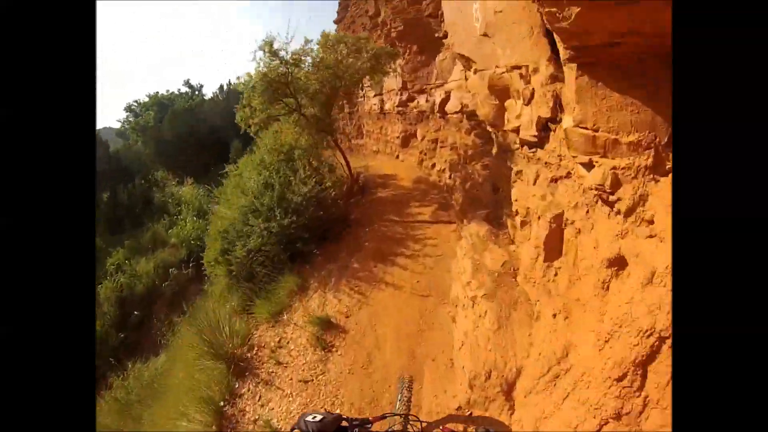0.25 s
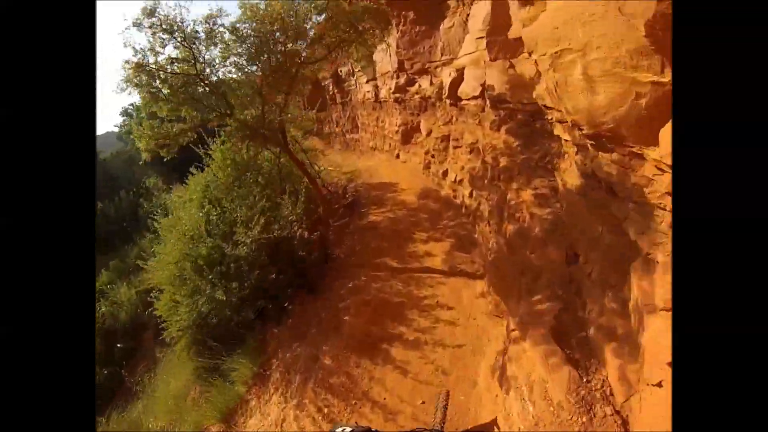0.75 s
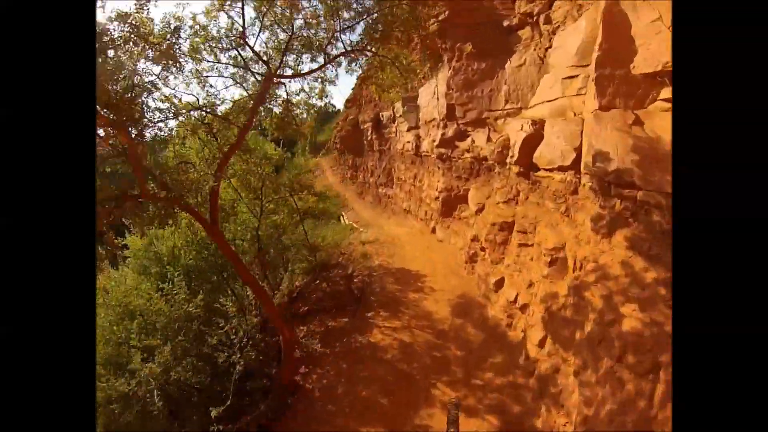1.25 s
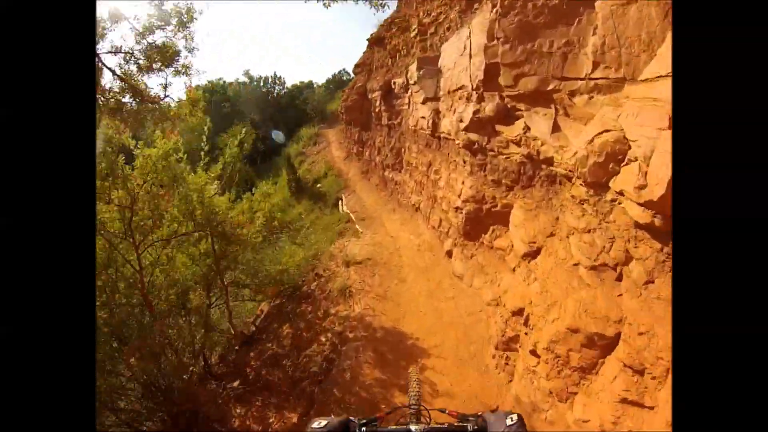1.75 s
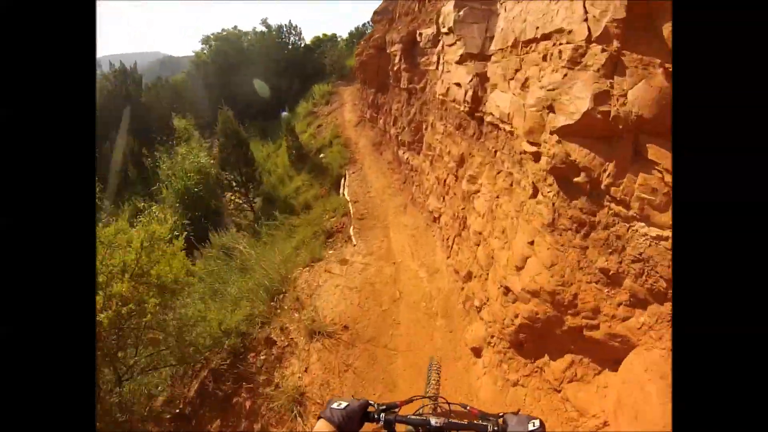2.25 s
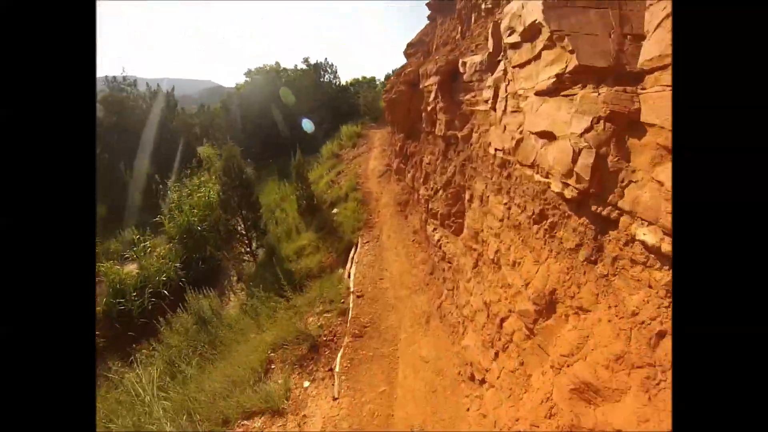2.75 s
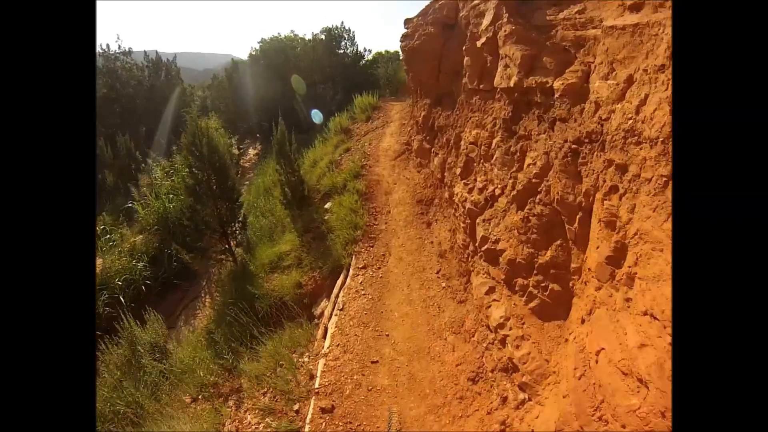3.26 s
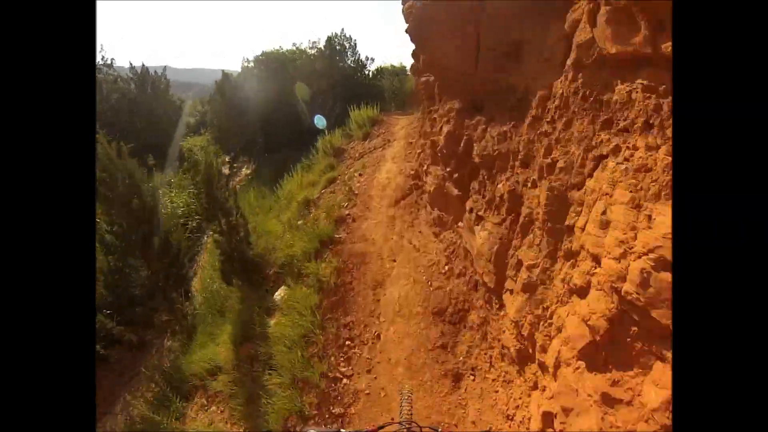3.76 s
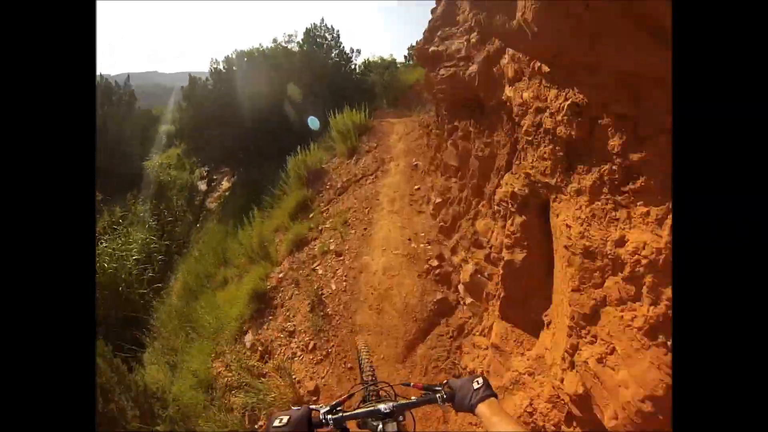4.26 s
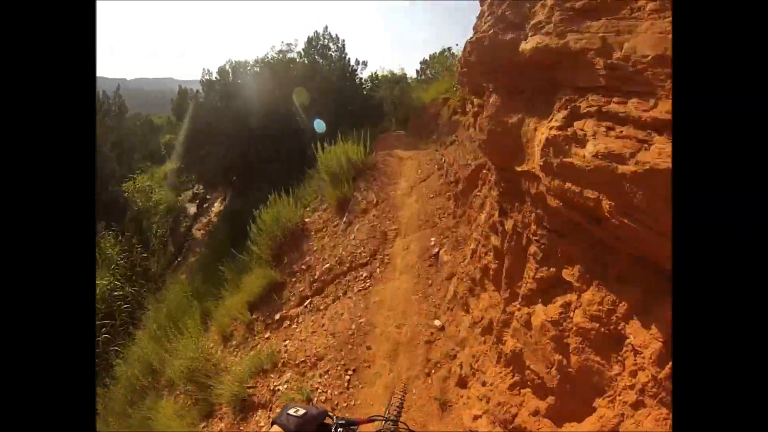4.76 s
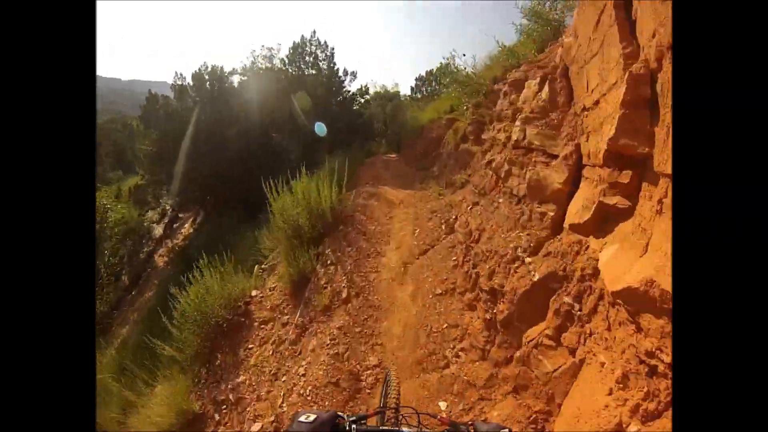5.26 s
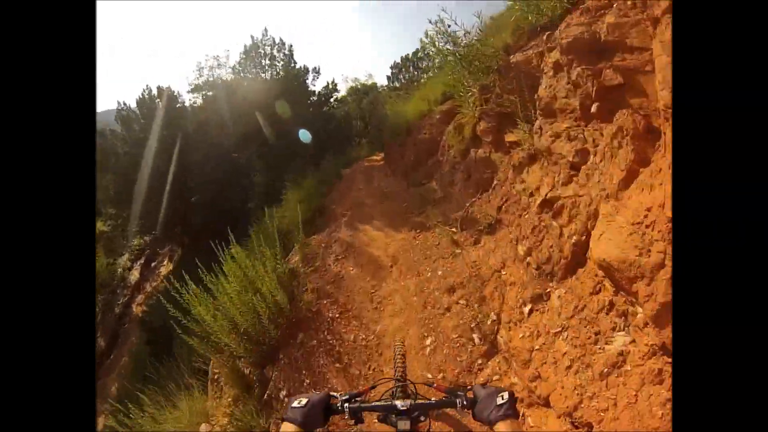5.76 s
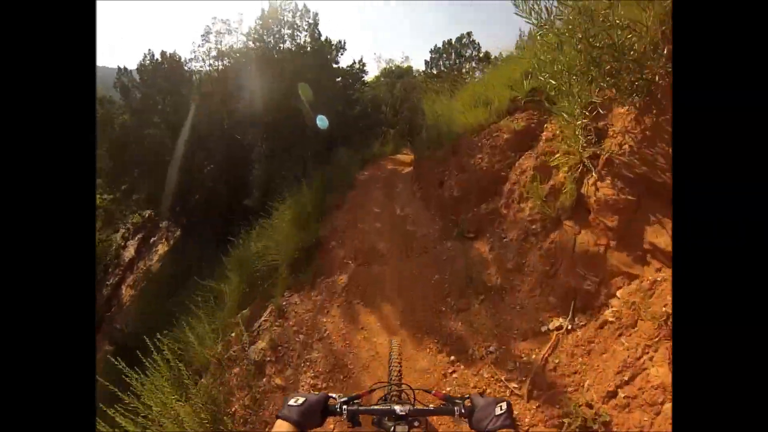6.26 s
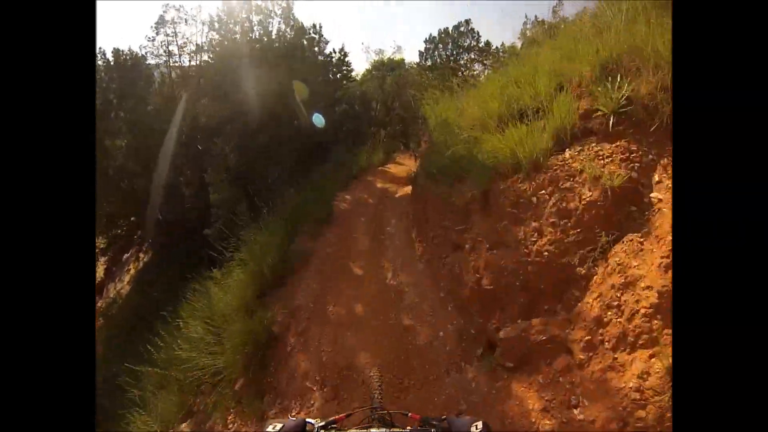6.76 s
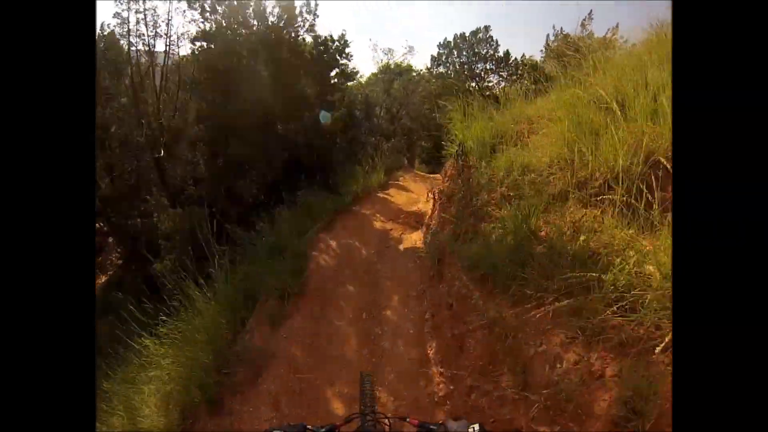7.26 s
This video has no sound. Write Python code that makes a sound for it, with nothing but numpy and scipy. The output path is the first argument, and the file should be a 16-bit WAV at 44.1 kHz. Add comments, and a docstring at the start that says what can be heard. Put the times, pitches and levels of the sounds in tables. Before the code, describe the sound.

A bike-mounted microphone in a muffling housing catches the steady rush of knobbly tyres on a dry trail, with gritty crackle and ticking pebbles. Sharp stone knocks come early, then lighter ground. Dull hollow frame bumps with brief loose rattles follow in the middle and later part. Uneven low wind thumps run underneath, with very faint high brake chirps and slight hiss. Open air, no room echo.

```python
"""A mountain bike's tyres rush and crunch down a dirt trail: shaped noise, grains and short decaying tones.
Stones strike the bike as damped sines with noise bursts, pebbles crack, short tones ring and rubber squeaks.
Bumps ring the frame's modes and rattle loose parts; the disc brakes chirp as gliding harmonic tones.
Wind buffets the microphone as low noise, with a band of flutter and tyre rumble above it and a faint hiss.
All but brakes, wind and rumble is coloured by the resonances of the plastic housing round the microphone."""
import sys
import numpy as np
from scipy import signal
from scipy.fft import rfft, irfft, next_fast_len
from scipy.io import wavfile
from scipy.ndimage import uniform_filter1d, map_coordinates

SR = 44100
rng = np.random.default_rng(int(sys.argv[2]) if len(sys.argv) > 2 else 0)


def master(y):
    """Save y as 16-bit WAV."""
    cut = np.clip(np.atleast_2d(y).T, -1, 1)
    pcm = np.round(cut * 32767)  # scale
    wavfile.write(sys.argv[1], SR, pcm.astype(np.int16))


N = 330750

# the tyres, louder with speed and on looser ground: time_s, base_roll_db, base_grit_db
TYRE_LEVELS = [(0.0, -40, -57), (0.29, -47, -59.5), (0.81, -47.5, -63.5), (1.1, -45, -58.5),
               (1.9, -47.5, -65.5), (2.2, -52.5, -65.5), (2.4, -48.5, -64.5), (3.07, -43, -69.5),
               (3.38, -38.5, -60.5), (3.7, -38.5, -62), (3.92, -38, -58), (4.25, -43, -64.5),
               (5.0, -46, -60), (5.75, -44.5, -60.5), (5.95, -50.5, -63), (6.3, -48, -66),
               (6.83, -54.5, -64), (7.16, -47.5, -67.5), (7.5, -45.5, -60.5)]
# spectrum of crushed grit, also of rattling parts: frequency_hz, relative_density_db
GRIT_SPECTRUM = [(400, 0), (1000, -0.5), (1700, 7), (2600, -0.5), (4000, -4), (5500, -12), (7500, -24),
                 (12000, -32), (16000, -39)]
# spectrum of sand spray and of chain and cable ticks: frequency_hz, relative_density_db
SPRAY_SPECTRUM = [(1500, -43), (4000, 6.5), (6000, 0), (9000, -2.5), (12000, -6.5), (15500, -31)]
# spectrum of what a stone blow stirs up in the bike: frequency_hz, relative_density_db
THUD_SPECTRUM = [(150, -25.5), (420, -5.5), (600, -6.5), (1050, -9.5), (1800, -11.5), (3000, -28),
                 (8000, -53)]
# low wind, and the band of flutter and tyre rumble above it: time_s, base_buffet_db, band_offset_db
WIND_LEVELS = [(0, -33, -9.5), (.2, -37, -10.5), (.42, -30.5, -8.5), (1.3, -32.5, -9.5), (1.85, -34.5, -10),
               (2.2, -36.5, -15.5), (2.55, -31, -11), (2.95, -29.5, -6), (3.4, -29, -8.5), (3.7, -29, -4),
               (4.05, -30.5, -8), (4.48, -27.5, -8), (4.68, -28, -13), (5.08, -39, -4.5), (5.3, -33.5, -9),
               (5.7, -34, -11), (6.2, -29.5, -8), (6.6, -37, -13.5), (6.85, -38, -8), (7.2, -38.5, -6),
               (7.5, -41, -8.5)]
# random unrest of both bands: dB per unit of a random curve, knots per second
UNREST_DB, UNREST_PER_S = 1.83, 12


def amp(db):
    """Level law: decibels to an amplitude gain."""
    return 10 ** (np.asarray(db) / 20)


def unit(x):
    """Power normalisation: scale to rms 1."""
    return x / np.sqrt(np.mean(x ** 2) + 1e-20)


def curves(rows):
    """Linear interpolation: one value per sample for each column after the time."""
    s, *cols = np.transpose(rows)
    return [np.interp(np.arange(N) / SR, s, c) for c in cols]


def wobble(rate):
    """Slow random modulation: a smooth curve through random knots, rate of them a second."""
    knots = rng.standard_normal(int(N * rate / SR) + 4)
    return map_coordinates(knots, [np.arange(N) * rate / SR])


def causal(x, level_of):
    """Minimum-phase filtering: the folded cepstrum turns a level in dB over frequency into a causal filter."""
    m = 2 * next_fast_len(len(x) // 2 + 4096)
    cepstrum = irfft(np.log(amp(level_of(np.fft.rfftfreq(m, 1 / SR)))))
    cepstrum[1:m // 2] *= 2
    cepstrum[m // 2 + 1:] = 0
    response = np.exp(rfft(cepstrum))
    return irfft(rfft(x, m) * response)[:len(x)]


def colour(x, spectrum):
    """Spectral shaping: filter x by (Hz, dB) points joined along log frequency, at rms 1."""
    f, db = np.transpose(spectrum)
    return unit(causal(x, lambda hz: np.interp(np.log(hz + 1), np.log(f), db)))


def fade(t, t60):
    """Exponential damping: a decay of 60 dB in t60 seconds."""
    return np.exp(-np.log(1000) * t / t60)


def add(track, s, sound):
    """Superposition: mix a sound into the track at time s."""
    part = track[max(round(s * SR), 0):][:len(sound)]
    part += sound[:len(part)]


def swells(rows):
    """Level modulation: a half-cosine rise or dip in dB for each (middle s, length s, change dB)."""
    t = np.arange(N) / SR
    return sum(change_db * np.cos(np.pi * np.clip((t - s) / length, -.5, .5))
               for s, length, change_db in rows)


def grains(rate, spread_db):
    """Shot noise: sparse impulses of uneven size and random sign, on average rate a second."""
    size = amp(spread_db * np.minimum(rng.exponential(size=N), 4))
    return unit((rng.random(N) < rate / SR) * size * rng.choice([-1, 1], N))


def scatter(t, spectrum, rise, t60, tail_db, tail_t60):
    """Granular contact: shaped noise swells, dies fast and leaves a ragged trickle."""
    drift = uniform_filter1d(rng.standard_normal(len(t)), size=130)
    ragged = unit(amp(5 * unit(drift)))
    decay = fade(t, t60) + amp(tail_db) * ragged * fade(t, tail_t60)
    shape = (1 - np.exp(-t / rise)) ** 2 * decay
    return colour(rng.standard_normal(len(t)) * shape, spectrum)


def tyres():
    """Rolling noise: knobs patter on packed dirt and crush grit and pebbles, which come in clumps."""
    # spectrum of knobs on packed dirt: frequency_hz, relative_density_db
    roll_spectrum = [(120, -7), (250, 4), (370, 5), (560, -3), (750, -4), (1100, -10.5), (1350, -16),
                     (1700, -15.5), (2200, -23), (4000, -35), (9000, -90)]
    # patches of loose gravel that the tyres plough through: middle_s, length_s, change_db
    gravel = [(.03, .08, 1), (.92, .07, 3), (2.41, .08, 6), (1.07, 0.047, 3), (1.24, 0.12, 5.5),
              (1.41, 0.092, 9), (3.28, .07, 8), (3.325, 0.045, 5), (3.42, 0.091, 7), (3.51, .08, 2),
              (3.61, .08, 2), (3.68, .05, -1), (3.85, .07, 3), (4.06, .05, 4), (5.32, .08, 4),
              (7.06, .06, 4), (7.37, 0.11, 2.5)]
    roll_db, grit_db = curves(TYRE_LEVELS)
    grit_db = grit_db + swells(gravel) - .7
    clumps = wobble(35)
    patter = rng.standard_normal(N) + amp(-9.0) * grains(rate=360, spread_db=1.0)
    crush = rng.standard_normal(N) + amp(-7.0) * grains(rate=420, spread_db=2.0)
    roll = amp(roll_db - 0.96 + 2.56 * clumps) * colour(patter, roll_spectrum)
    grit = amp(grit_db + 3.5 + 1.34 * clumps) * colour(crush, GRIT_SPECTRUM)
    tick_db = (roll_db + grit_db) / 2 - 1 + clumps
    return roll + grit + amp(tick_db) * pebbles(rate=240, spread_db=4.3)


def pebbles(rate, spread_db):
    """Damped oscillation: small stones tick under the tread, each at its own pitch for a cycle or two."""
    rows = rng.random((int(rate * N / SR), 3))
    t = np.arange(SR // 100) / SR
    hz = 800 * 5 ** rows[:, 1:2]
    # the higher the pitch, the weaker the tick
    size = amp(-spread_db * np.log(rows[:, 2:] + .04)) * 800 / hz
    ticks = size * np.sin(2 * np.pi * hz * t) * fade(t, 2.8 / hz) * (1 - np.exp(-t * hz))
    where = (rows[:, :1] * N).astype(int) + np.arange(len(t))
    return unit(np.bincount(where.ravel(), ticks.ravel(), N)[:N])


def crackle():
    """Brittle fracture and light impact: pebbles snap under the tread; slack chain and cables click higher up."""
    # pebbles that crack under the tread: start_s, nominal_peak_db
    cracks = [(0.2637, -38), (0.413, -48.5), (0.504, -43.5), (0.605, -46), (0.802, -41), (0.9385, -41),
              (1.2423, -41), (1.3593, -45), (1.7544, -46), (1.958, -45), (2.1011, -48), (2.2218, -48.5),
              (2.384, -47), (2.808, -47), (3.0545, -41.5), (3.7884, -43), (4.5627, -44), (4.8449, -40),
              (4.9746, -53), (5.8336, -48), (6.138, -44), (6.2543, -42.5), (6.5815, -47), (6.6493, -47),
              (7.3003, -47), (7.397, -45)]
    # spectrum of a cracking pebble: frequency_hz, relative_density_db
    snap = [(600, -4), (1500, 4.5), (2800, 3), (4200, -3), (5500, -10.5), (8000, -24), (14000, -33)]
    # chain and cables tick against the frame: start_s, nominal_peak_db
    chain_ticks = [(0.052, -50), (0.6494, -55), (0.7577, -51), (1.0984, -56), (1.1528, -56), (1.1826, -54),
                   (1.3588, -55), (1.755, -57), (4.031, -55), (4.5072, -58), (5.7099, -55), (6.333, -55),
                   (6.9187, -53), (6.997, -54), (7.0574, -54)]
    # spectrum of their thin metal click: frequency_hz, relative_density_db
    click = [(2500, -20), (5000, 5.5), (7000, -0.5), (10500, -4), (12500, -9), (15500, -22)]
    out, t = np.zeros(N), np.arange(SR // 10) / SR
    for s, peak_db in cracks:
        burst = scatter(t, snap, rise=0.00048, t60=0.033, tail_db=-17.5, tail_t60=0.14)
        add(out, s, amp(peak_db - 18.5) * burst)
    for s, peak_db in chain_ticks:
        burst = scatter(t, click, rise=0.00083, t60=.035, tail_db=-14, tail_t60=0.11)
        add(out, s, amp(peak_db - 18.5) * burst)
    return out


def stones():
    """Impact: a stone scuffs, clacks, bounces once within milliseconds and throws off chips and sand."""
    # single stones, loud and soft, that strike at set times:
    # start_s, nominal_peak_db, pitch_hz, crunch_re_peak_db, spray_re_peak_db
    single_stones = [(0.016, -31, 900, -16, -42), (0.052, -34, 1150, -15, -36),
                     (0.115, -28.5, 1100, -16, -45), (0.296, -28, 1300, -24, -41),
                     (0.44, -29, 910, -12, -40), (0.545, -12, 850, -25, -52), (0.664, -38, 1000, -7, -30),
                     (0.85, -26.5, 960, -11, -55), (0.862, -35, 1100, -14, -45),
                     (0.878, -11, 1106, -18, -37), (0.891, -24.5, 900, -12, -30),
                     (0.994, -44.5, 1060, -20, -14), (1.662, -25, 1500, -12.5, -31),
                     (1.669, -31, 900, -8.5, -27), (1.861, -35, 846, -3.5, -46),
                     (1.977, -40, 1390, -8, -23), (2.91, -50, 1100, -5, -35), (3.074, -40.5, 721, -7, -17),
                     (3.262, -38, 1390, -10, -36), (3.285, -35, 1400, -10, -40),
                     (3.405, -34, 1270, -15, -40), (3.42, -34, 1230, -11.5, -41),
                     (3.48, -42, 1200, -27, -44), (3.515, -39, 1490, -13, -40),
                     (3.674, -34, 1310, -26, -45), (3.686, -38, 1450, -21, -42),
                     (3.835, -35, 1470, -19, -32), (3.8665, -27, 900, -29, -46),
                     (3.911, -34, 800, -10, -34), (4.175, -32.5, 826, -34, -44),
                     (4.218, -32.5, 850, -21, -28), (4.39, -45.5, 1400, -0.5, -30),
                     (4.724, -34.5, 815, -13, -31), (4.786, -34, 756, -10.5, -26),
                     (4.934, -32.5, 756, -11, -44), (5.136, -29.5, 1010, -10, -45),
                     (5.279, -33.5, 1400, -6.5, -34), (5.343, -39, 896, -16, -15),
                     (5.356, -27, 850, -18, -41), (5.367, -29, 960, -23, -43), (5.376, -26, 930, -32, -44),
                     (5.545, -49.5, 764, 0, -1.5), (5.591, -22, 860, -29, -13.5),
                     (5.962, -32, 1000, -16, -42), (6.114, -48.5, 813, -1.5, -22),
                     (6.314, -37.5, 740, -13.5, -32), (6.52, -38.5, 1320, -5, -20),
                     (7.047, -41, 990, -11, -28), (7.077, -38, 1150, -15, -26),
                     (7.461, -40, 1090, -15, -17.5)]
    # spectrum of a struck stone's crunch: frequency_hz, relative_density_db
    crumbs = [(400, -4), (1000, 3.5), (1800, 9), (2500, 4.5), (3300, 1), (4100, -0.5), (5000, -9.5),
              (7500, -24.5), (16000, -42)]
    out, t = np.zeros(N), np.arange(SR // 5) / SR
    lead = t[:len(t) // 4]
    contact = fade(t, .008) * (1 - np.exp(-t / .0005)) ** 2
    for s, peak_db, hz, crunch_db, spray_db in list(single_stones) + small_stones():
        clack = np.sin(2 * np.pi * hz * t) * contact
        bounce_s = rng.uniform(0.00184, 0.00281)
        bounce_hz = hz * rng.uniform(0.83, 1.27)
        add(clack, bounce_s, 0.62 * np.sin(2 * np.pi * bounce_hz * t) * contact)
        add(out, s, amp(peak_db - 23) * unit(clack))
        # the tread squeezes the stone just before it flies
        scuff = colour(rng.standard_normal(len(lead)) * fade(lead, 0.45)[::-1], THUD_SPECTRUM)
        add(out, s - len(lead) / SR, amp(peak_db - 35.5) * scuff)
        thud = scatter(t, THUD_SPECTRUM, rise=0.00025, t60=0.019, tail_db=-20.0, tail_t60=0.3)
        add(out, s, amp(peak_db - 26.5) * thud)
        # a chip snaps off and rings higher than the stone
        chip_hz = rng.uniform(2130, 3300)
        chip = np.sin(2 * np.pi * chip_hz * t) * fade(t, 0.0053) * (1 - np.exp(-t / 0.00036))
        add(out, s + .001, amp(peak_db + crunch_db + 10) * chip)
        crunch = scatter(t, crumbs, rise=0.00057, t60=0.048, tail_db=-21.5, tail_t60=0.85)
        add(out, s + 0.001467, amp(peak_db + crunch_db - 15.0) * crunch)
        spray = scatter(t, SPRAY_SPECTRUM, rise=0.00097, t60=0.033, tail_db=-29, tail_t60=0.5)
        add(out, s + 0.00107, amp(peak_db + spray_db - 13) * spray)
    return out


def small_stones():
    """Random excitation: the tread flicks up small stones at random, harder where the ground is loose."""
    stones_per_s = 3
    _, grit_db = curves(TYRE_LEVELS)
    draws = rng.random((int(stones_per_s * N / SR), 5))
    rows = []
    for moment, *traits in draws:
        i = int(moment * N)
        # each trait is spread evenly either side of its mean
        level, pitch, crunch, spray = 2 * np.array(traits) - 1
        rows.append((i / SR, grit_db[i] + 7.5 + 1.9 * level, 1000 + 220 * pitch, 5.3 * crunch, -13 + 3.3 * spray))
    return rows


def pings():
    """Damped mode pairs: short ringing tones sound with some stone strikes and frame bumps."""
    # short ringing tones: start_s, pitch_hz, relative_level_db, t60_s
    tones = [(.546, 1450, -19, .009), (0.881, 3920, -25.5, 0.022), (.882, 1156, -27, 0.052),
             (3.302, 1000, -19, 0.026), (3.733, 1440, -33.5, 0.027), (4.2685, 6900, -35.5, 0.0099),
             (4.389, 2780, -32.5, 0.025), (5.137, 2470, -16.5, 0.0099), (5.28, 2570, -34, 0.021),
             (5.282, 1510, -38, .03), (5.586, 608, -11.5, 0.025), (5.586, 1006, -15.5, 0.035),
             (6.354, 1500, -31, 0.02), (6.524, 1350, -38, 0.027)]
    rise_s, pair_ratio, pair_db = 0.0011, 1.1, -13
    out, t = np.zeros(N), np.arange(SR // 10) / SR
    for s, hz, db, t60 in tones:
        upper = np.sin(2 * np.pi * (pair_ratio * hz * t + rng.random()))
        pair = np.sin(2 * np.pi * hz * t) + amp(pair_db) * upper
        add(out, s, amp(db) * pair * fade(t, t60) * (1 - np.exp(-t / rise_s)))
    return out


def squeak():
    """Stick-slip: rubber squeaks on a pinched stone, with a dull scrub, until the stone shoots out."""
    # the one squeak of the tread: start_s, length_s, mean_pitch_hz, relative_level_db
    s, length, hz, db = (1.643, .034, 915, -34.5)
    out = np.zeros(N)
    n = int(length * SR)
    pitch = hz * (1 + .02 * wobble(300)[:n])
    phase = 2 * np.pi * np.cumsum(pitch) / SR
    scrub = amp(-4) * colour(rng.standard_normal(n), THUD_SPECTRUM)
    add(out, s, amp(db) * (np.sin(phase) + scrub) * signal.windows.tukey(n, .8))
    return out


def frame():
    """Modal ringing: bumps throw loose parts at the frame; blow and weak rebound ring its modes together."""
    # bumps that clunk the frame: start_s, nominal_peak_db, low_ring_db, pitch_ratio,
    # crunch_re_peak_db, rattle_re_peak_db
    bumps = [(.879, -18, -3, 1.08, -19, -19), (1.657, -25.5, -3, 1.06, -8, -27),
             (3.0, -23.5, -13, 0.93, -13.5, -32), (3.217, -24, -8, 0.92, -13.5, -28.5),
             (3.301, -12, -15, 0.97, -32, -36), (3.311, -13.5, -18, 0.96, -15.5, -32.5),
             (4.03, -20, -9, 1, -17, -30), (4.2634, -11, -15, 1.015, -14, -24.5),
             (4.2675, -9.5, -20, 0.972, -15.5, -29.5), (4.362, -20, -12.5, 1.01, -19.5, -35),
             (4.48, -18.5, -14.5, 0.96, -17, -31), (5.456, -19, -10, 0.98, -18, -42),
             (5.587, -14.5, -19.5, 0.949, -20, -15.5), (5.682, -21.5, -9, 1, -12, -25),
             (5.881, -18.5, -11.5, 0.97, -13, -34), (6.35, -22, -8.5, 1.03, -18, -30),
             (6.364, -19, -12.5, 0.94, -16, -41), (7.149, -25, -5, 0.97, -11, -25)]
    # the frame's modes before each bump's scaling: frequency_hz, relative_level_db, t60_s
    modes = [(325, -18, 0.07), (406.5, 0, 0.065), (697.6, -1.5, 0.077), (740, -1.5, 0.07),
             (980, 3.5, 0.032), (1244, -9, 0.043), (1424, -7.5, 0.031), (1860, -18, 0.04),
             (2070, -7.5, 0.032)]
    # spectrum of loose parts chattering after a bump: frequency_hz, relative_density_db
    chatter_spectrum = [(600, -21), (1100, -14), (1400, 2), (1800, 7), (2300, -7), (3000, -11), (4500, -39),
                        (8000, -54)]
    rebound_s, rebound_db = 0.0026, -10.5
    out, t = np.zeros(N), np.arange(SR // 6) / SR
    hz, db, t60 = np.transpose(modes)[:, :, None]
    for s, peak_db, low_db, ratio, crunch_db, rattle_db in bumps:
        strength = amp(db + (low_db + 17.0) * (hz < 600))
        pitch = ratio * hz * np.exp(.012 * rng.standard_normal(hz.shape))
        ring = np.sum(strength * np.sin(2 * np.pi * pitch * t) * fade(t, t60), axis=0)
        ring = ring * (1 - np.exp(-t / 0.001))
        clunk = ring.copy()
        add(clunk, rebound_s, amp(rebound_db) * ring)
        add(out, s, amp(peak_db - 23.5) * unit(clunk))
        chatter = scatter(t, chatter_spectrum, rise=0.00094, t60=0.017, tail_db=-28, tail_t60=.1)
        add(out, s + 0.00096, amp(peak_db + crunch_db - 22.0) * chatter)
        rattle = scatter(t, GRIT_SPECTRUM, rise=0.0018, t60=0.026, tail_db=-26, tail_t60=0.12)
        add(out, s + 0.001034, amp(peak_db + rattle_db - 13.0) * rattle)
        # the chain and cables tick on top
        ticks = scatter(t, SPRAY_SPECTRUM, rise=0.00092, t60=0.018, tail_db=-28, tail_t60=.1)
        add(out, s + 0.0016, amp(peak_db + rattle_db - 41.0) * ticks)
    return out


def brakes():
    """Friction-driven vibration: a pad grazes the rotor, which sings with late rough overtones and rings on."""
    # brake chirps: start_s, length_s, middle_pitch_hz, rise_hz,
    # relative_fundamental_db, relative_overtone_db
    chirps = [(.698, .092, 1760, 25, -54, -85), (.753, .02, 5150, 0, -63, -85),
              (1.57, .04, 12100, -60, -70, -100), (1.585, .04, 4600, 0, -69, -95),
              (1.885, .04, 3300, 0, -70, -88), (2.012, .09, 3330, 28, -66.5, -78),
              (2.42, .115, 1750, 10, -63, -87), (2.57, .09, 1760, 0, -68, -90),
              (2.664, .056, 3375, 27, -64.5, -68), (3.085, .039, 3280, 4, -67, -85),
              (6.008, .046, 3340, -110, -63, -72), (6.733, .045, 3315, -50, -61, -73),
              (6.802, .055, 3330, 80, -61.5, -74), (6.95, .056, 3360, 220, -63, -72)]
    overtone_lag_s, overtone_rough_rad = .011, .7
    rotor_t60_s, rotor_gain = .18, .32
    out, waver = np.zeros(N), .004 * wobble(400)
    for s, length, hz, rise_hz, db, overtone_db in chirps:
        n = int(length * SR)
        pitch = hz * (1 + waver[int(s * SR):][:n]) + rise_hz * np.linspace(-.5, .5, n)
        phase = 2 * np.pi * np.cumsum(pitch) / SR
        swell = signal.windows.tukey(n, .8)
        rasp = overtone_rough_rad * unit(uniform_filter1d(rng.standard_normal(n), size=90))
        add(out, s, amp(db) * np.sin(phase) * swell)
        for k in range(2, 4):
            if k * hz < SR / 2:
                overtone = np.sin(k * phase + (k - 1) * rasp) * swell
                add(out, s + overtone_lag_s, amp(overtone_db) / (k / 2) * overtone)
    out = out * amp(5.5 + 2.5 * wobble(90))
    # decaying noise stands for the dense ringing of the disc
    t = np.arange(SR // 4) / SR
    ring = rng.standard_normal(len(t)) * fade(t, rotor_t60_s)
    return out + rotor_gain * signal.fftconvolve(out, ring / np.linalg.norm(ring))[:N]


def wind_and_rumble():
    """Turbulent pressure: wind buffets low; a separately levelled band of flutter and tyre rumble lies above."""
    # spectrum of the low buffeting: frequency_hz, relative_density_db
    buffet_spectrum = [(8, -14.5), (22, -1), (45, 0), (75, -4.5), (105, -14), (170, -28.5), (400, -81)]
    # spectrum of flutter and tyre rumble: frequency_hz, relative_density_db
    upper_spectrum = [(40, -25), (75, -7.5), (100, -2.5), (150, -6), (220, -13), (330, -23.5), (600, -41.5),
                      (2000, -81)]
    upper_growth = 0.79  # dB of the upper band for each dB of buffet
    buffet_db = airflow()
    mean_db = buffet_db.mean()
    _, offset_db = curves(WIND_LEVELS)
    upper_db = mean_db + offset_db + upper_growth * (buffet_db - mean_db)
    upper_db = upper_db + UNREST_DB * wobble(UNREST_PER_S)
    buffet = amp(buffet_db) * even_noise(buffet_spectrum, span=0.078)
    return buffet + amp(upper_db) * even_noise(upper_spectrum, span=0.089)


def airflow():
    """Unsteady flow: wind strength in dB from the base flow, gusts, lulls and random unrest."""
    # single gusts that thump over the flow: crest_s, length_s, boost_db
    gusts = [(.02, 0.14, 3), (.77, 0.1, 1), (1.138, 0.088, 9), (1.226, 0.085, 8), (1.333, 0.068, 4),
             (1.516, 0.11, 8), (1.955, 0.071, 4), (2.057, 0.08, 5), (2.425, 0.058, 10), (2.497, 0.061, 8),
             (2.629, 0.15, 9.5), (2.7, 0.051, 6.5), (3.622, .09, 7), (4.184, 0.12, 6.5), (4.268, 0.11, 8),
             (4.408, 0.1, 6), (4.525, 0.089, 5.5), (5.465, .088, 10), (5.672, 0.21, 13.5), (5.832, 0.1, 11),
             (5.894, 0.071, 19), (6.043, .085, 5), (6.125, 0.073, 2.5), (6.838, 0.18, 9),
             (7.45, 0.056, 10.5)]
    # lulls between the gusts: trough_s, length_s, change_db
    lulls = [(.16, 0.069, -2), (.97, 0.11, -2), (1.77, 0.077, 0), (2.14, 0.069, -5), (2.23, .07, -7),
             (2.76, 0.053, -4), (4.86, .06, -3), (5.07, .07, -3), (5.22, .06, -3), (5.535, 0.054, -4),
             (5.96, .06, -10), (6.69, 0.07, -3.5), (6.95, .06, 0)]
    flow_db, _ = curves(WIND_LEVELS)
    return flow_db + swells(gusts) + swells(lulls) + UNREST_DB * wobble(UNREST_PER_S)


def even_noise(spectrum, span):
    """Short-term power normalisation: coloured noise whose strength is evened out over span seconds."""
    x = colour(rng.standard_normal(N), spectrum)
    return x / np.sqrt(np.abs(uniform_filter1d(x ** 2, int(span * SR))) + 1e-6)


def hiss():
    """Stationary noise: a faint, steady coloured hiss."""
    # spectrum of the hiss: frequency_hz, relative_density_db
    hiss_spectrum = [(1000, 1.5), (5000, 3.5), (9000, -1), (12000, -2.5), (15500, -8.5)]
    return amp(-69) * colour(rng.standard_normal(N), hiss_spectrum)


def housing(x):
    """Resonant transmission: Gaussian peaks and hollows in level colour sound passing the housing."""
    # resonances and hollows of the housing: frequency_hz, width_hz, gain_db
    resonances = [(2146, 247, -5), (2900, 150, 2), (3470, 210, -4.5), (3970, 160, 1), (4730, 320, -3),
                  (5460, 390, 1.5), (6330, 280, -1.5), (6800, 130, 0.5), (7850, 160, 0.5), (8400, 290, 1.5),
                  (10500, 300, 1)]
    return causal(x, lambda f: sum(db * np.exp(-((f - hz) / width) ** 2) for hz, width, db in resonances))


def scene():
    """Superposition: bike and hiss pass the housing; brakes, wind and rumble add to them directly."""
    bike = tyres() + frame() + stones() + crackle() + pings() + squeak()
    return (housing(bike + hiss()) + brakes() + wind_and_rumble())[None]


def record(dry):
    """Band limiting: the microphone keeps nothing at or above its top frequency."""
    top_hz = 15400
    m = next_fast_len(N + SR // 2)
    passed = np.fft.rfftfreq(m, 1 / SR) < top_hz
    return irfft(rfft(dry, m) * passed, m)[:, :N]


dry = scene()
out = record(dry)
master(out)
```